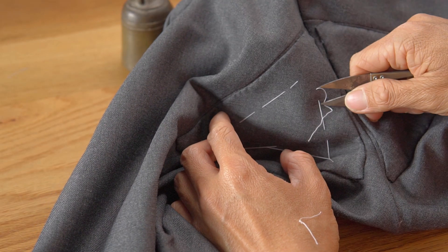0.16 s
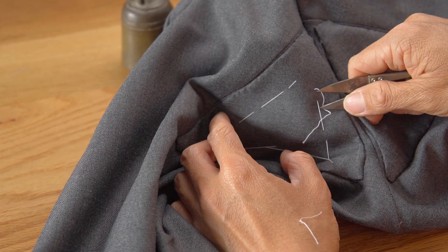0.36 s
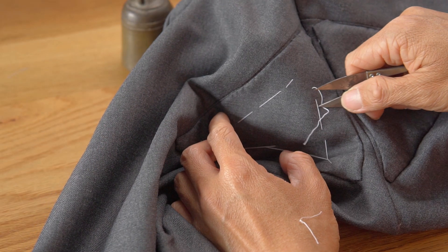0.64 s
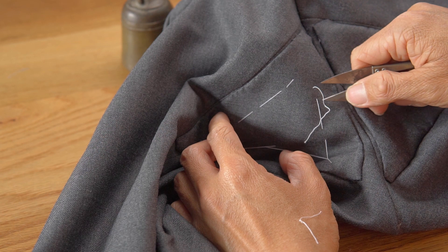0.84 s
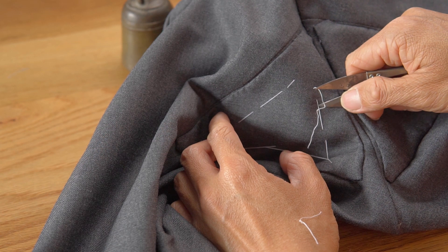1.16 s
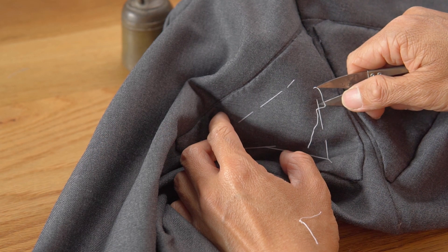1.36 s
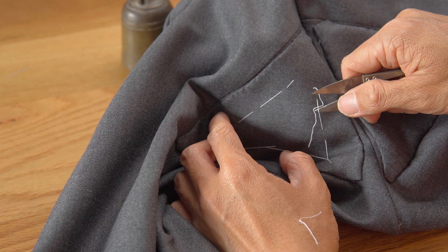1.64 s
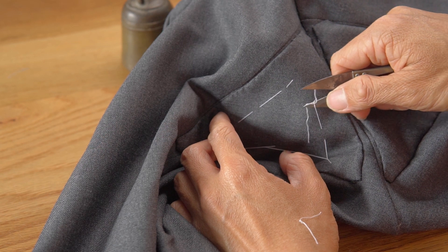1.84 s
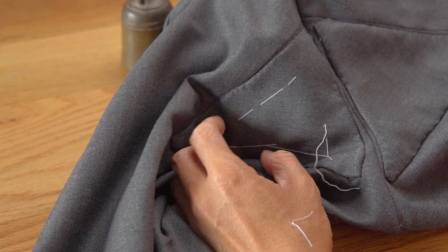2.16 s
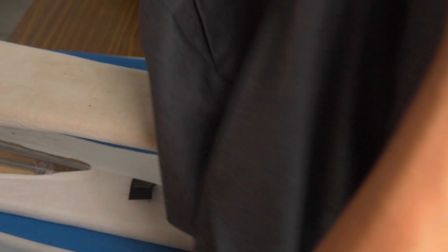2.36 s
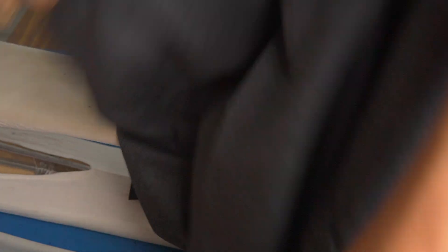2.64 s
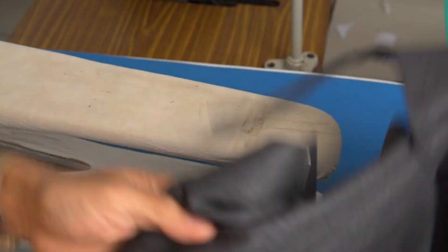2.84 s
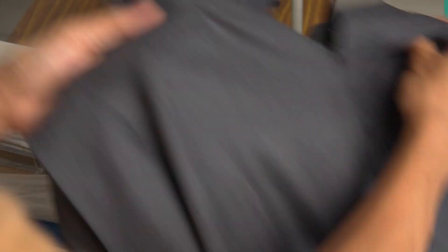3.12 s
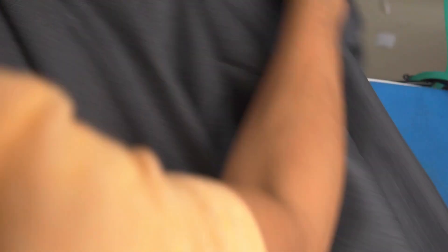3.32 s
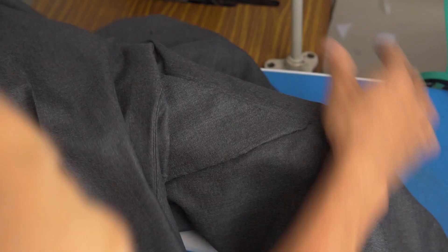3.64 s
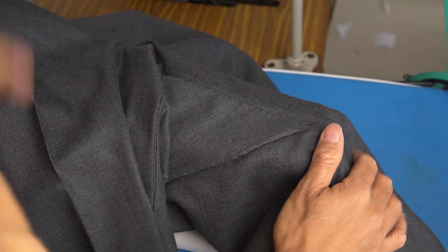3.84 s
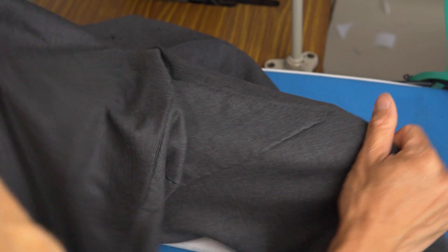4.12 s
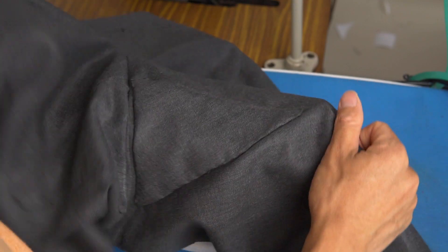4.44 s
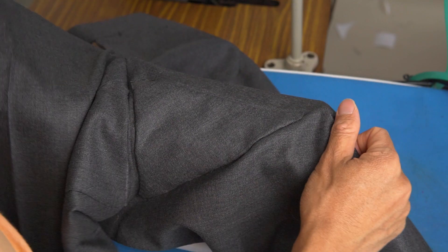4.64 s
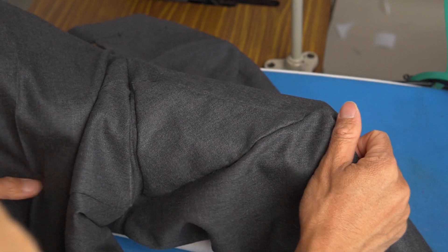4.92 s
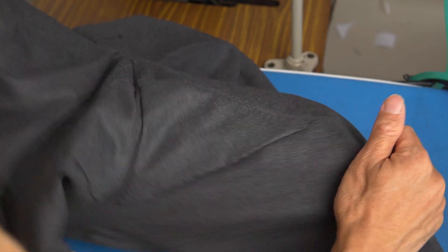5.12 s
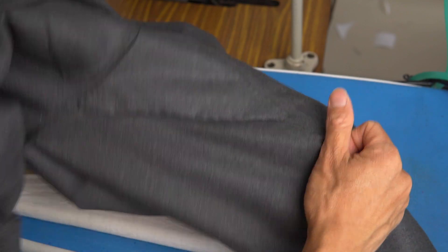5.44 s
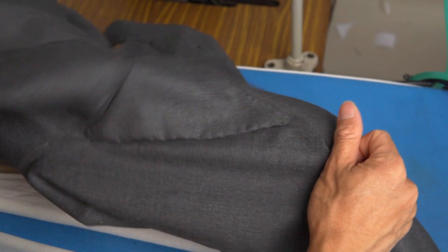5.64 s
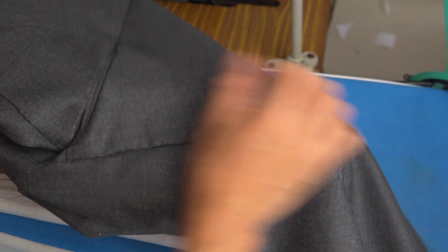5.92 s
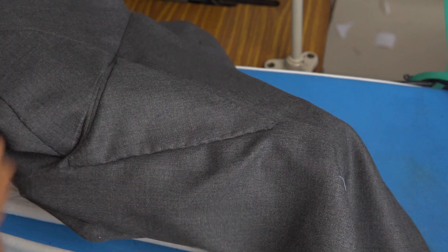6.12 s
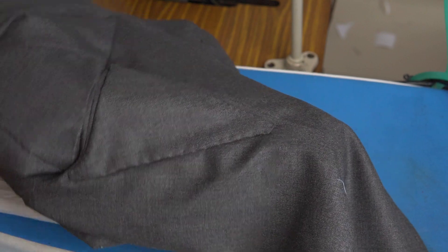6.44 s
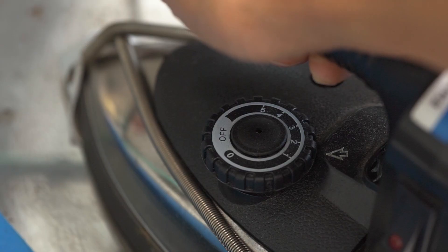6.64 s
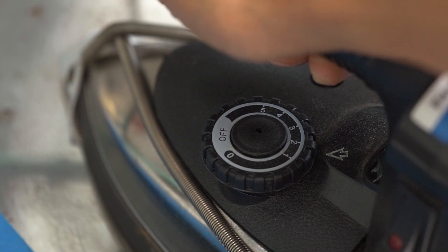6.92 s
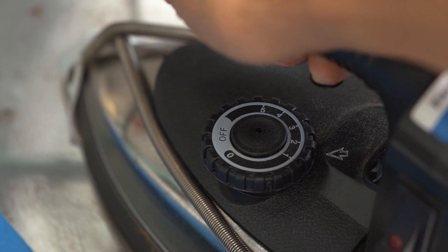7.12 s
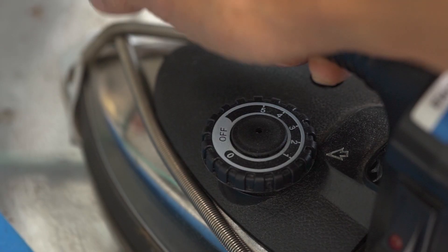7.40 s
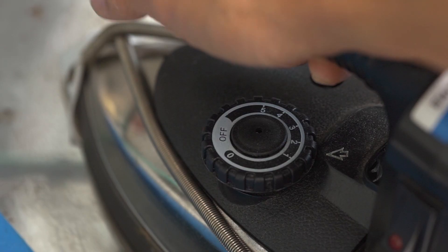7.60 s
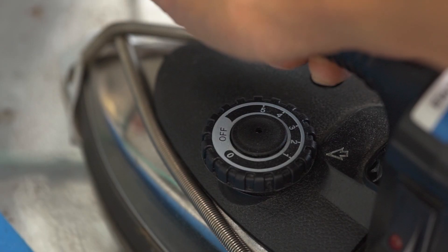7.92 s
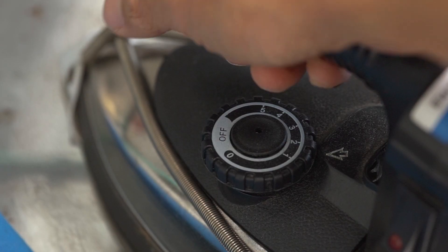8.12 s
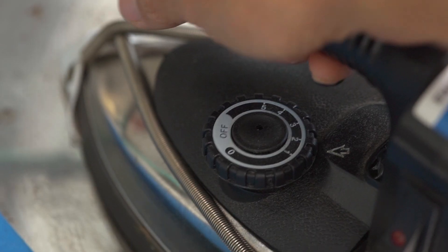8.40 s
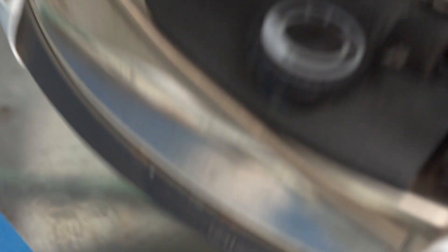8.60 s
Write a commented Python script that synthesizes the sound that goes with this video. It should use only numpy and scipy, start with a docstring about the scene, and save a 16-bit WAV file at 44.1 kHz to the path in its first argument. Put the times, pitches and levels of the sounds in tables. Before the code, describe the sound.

A small workshop heard close up, with ventilation rumble and a low rough machine drone throughout, slightly stronger near the end. From 0 to 1.7 s, tiny dry scissor ticks cluster around 0.2-0.35 and 1.35-1.6, with faint hand rubs on cloth. Near 1.9 a palm drags and ends in a dull pat. From 2.4 to 3.7 a heavy jacket is swung and spread: grainy rustle, low gusts, damped flaps, a strong snap at 2.96. Strokes and crisp snaps continue at 4.2-4.3 and 5.07, a tiny rising squeak at 5.33, flaps at 5.86 and 6.05; rustling stops at 6.55. A very loud, bright metallic valve clack cracks at 6.76, another at 7.06, with smaller rattles and low board thuds. Steam swells from 7.3, peaks near 7.6, then dulls and fades after 8.1. At 8.55 come a muffled knock and soft handle rub, then drone alone.

```python
"""A tailor's bench in a small workshop, close to one microphone: ventilation and a machine drone lie behind.
Short ticks of noise are scissors nipping threads; grainy noise is a hand on cloth, then a jacket being spread.
Damped tones with crisp noise are folds snapping and pats on the ironing board; the cloth squeaks once.
The steam iron's valve clacks on and off as a crack over many ringing modes, low tones thud on the board,
and swelling noise is its puff of steam. A short diffuse room echo follows the handwork and the valve."""
import sys
import numpy as np
from scipy import signal
from scipy.fft import rfft, irfft, next_fast_len
from scipy.io import wavfile
from scipy.ndimage import uniform_filter1d, map_coordinates

SR = 44100
rng = np.random.default_rng(int(sys.argv[2]) if len(sys.argv) > 2 else 0)


def wrap_up_sound(samples):
    """Save the sound to the file named by the first command line argument, as 16-bit audio."""
    columns = np.atleast_2d(samples).T
    # keep every value between -1 and 1, then stretch to whole-number steps
    tamed = np.clip(columns, -1, 1)
    steps = np.round(tamed * 32767).astype(np.int16)
    wavfile.write(sys.argv[1], SR, steps)


N = 386315
TIME = np.arange(N) / SR  # s

# All levels in the tables are relative within their source.
# ventilation rumble: f/Hz, level/dB per Hz
AIR_SPECTRUM = [(13, -32.5), (22, -1.5), (45, 0.5), (70, -7), (102, -5), (198, -11.5), (260, -9),
                (430, -15), (900, -19), (1320, -18), (1580, -27.5), (2300, -33), (5000, -44.5),
                (15500, -55)]
AIR_DB = -48.5
# resonances of the machine drone: f/Hz, width/Hz, level/dB
DRONE_MODES = [(99.5, 22.2, 1.5), (145.3, 22, 0), (195, 26, -2), (270.3, 26, -5), (391, 62, -13)]
DRONE_FIRST_DB, DRONE_SECOND_DB, DRONE_THIRD_DB = -52.5, -51.5, -48.5
DRONE_STEP, HANDLING_END = 2.0, 6.555  # s; the drone steps at both, and the rustling stops at the second
# decay of the workshop echo: f/Hz, t60/s
ROOM_DECAY = [(200, 0.58), (1500, 0.21), (4300, 0.46), (8000, 0.36), (11000, 0.29), (15000, 0.17)]

# swings of the jacket that push air at the microphone: t/s, level/dB
JACKET_SWINGS = [(2.72, -34), (3.27, -34), (3.57, -39.5), (3.85, -44.5), (4.2, -47), (6.08, -38)]
SWING_RISE_S, SWING_T60 = 0.069, 1.0  # s
# air pushed by a swing: f/Hz, level/dB per Hz
GUST_SPECTRUM = [(10, -11), (25, 3.5), (50, -14.5), (95, -14.5), (200, -26.5), (600, -79)]

# strokes of the hands over the cloth: middle t/s, length/s, rub level/dB, weight of the folds over the rub/dB
HAND_STROKES = [(0.062, 0.13, -63, -5), (0.36, 0.83, -71.5, -7), (1.55, 0.29, -69, -4),
                (1.84, 0.15, -64, -9), (2.17, 0.32, -64, -1), (2.44, 0.15, -58.0, 0),
                (2.728, 0.32, -50.5, 0), (2.769, 0.056, -44.5, 1), (2.939, 0.13, -52, 8),
                (3.154, 0.3, -51.0, 0), (3.3, 0.23, -51.0, 5), (3.535, 0.1, -54, 8),
                (3.59, 0.44, -56.0, -0.5), (3.959, 0.11, -50.5, -4), (4.063, 0.11, -49.5, -3),
                (4.243, 0.23, -49.0, 4.5), (4.55, 0.27, -55, 3), (4.924, 0.16, -52.5, 1),
                (5.093, 0.09, -49.0, 0.5), (5.262, 0.32, -52.5, 3), (5.51, 0.13, -56.5, 2),
                (5.7, 0.21, -51.0, 3.5), (5.925, 0.19, -57.5, 2), (6.094, 0.13, -55, 8),
                (6.385, 0.44, -51.5, 1)]
STROKE_STEEP = 3.55  # how abruptly a hand gathers speed and comes to rest
# hiss of the sliding weave: f/Hz, level/dB per Hz
WEAVE_SPECTRUM = [(710, -32), (1200, -4.5), (1520, -0.5), (1990, -3), (2320, -2.5), (2580, -2.5),
                  (3240, -4.5), (6250, -7.5), (6810, -10), (8830, -6), (10200, -15.5), (13600, -15),
                  (15800, -22)]
# lower rustle of the folds: f/Hz, level/dB per Hz
FOLDS_SPECTRUM = [(130, -18), (300, 1), (600, 2.5), (1100, -1), (1700, -8), (3000, -27), (6000, -47)]
# the weave hisses brighter the faster it slides and duller when bunched in folds
SHEEN_DB, SHEEN_AT_DB = 2.5, -54.5  # treble lift at this rub level, with no extra weight
SHEEN_PER_SPEED, SHEEN_PER_WEIGHT = 0.28, 0.64  # dB of treble per dB

# rub of the pressing palm: f/Hz, level/dB per Hz
PALM_SPECTRUM = [(170, -34), (330, 6), (700, -4.5), (1400, -1), (2300, -10), (4500, -15.5), (7000, -40)]
SWEEP_START, SWEEP_PRESS, SWEEP_END = 1.895, 1.957, 1.978  # s
SWEEP_RISE_S, SWEEP_PRESS_S, SWEEP_LIFT_S = 0.041, 0.0077, 0.0095
SWEEP_DB, PALM_LIGHT_DB, PALM_PRESSED_DB = -50, 4.5, 16.5  # palm levels are over the weave
SQUEAK_START, SQUEAK_S, SQUEAK_DB = 5.326, 0.046, -36.5
SQUEAK_HZ, SQUEAK_HZ_PER_S = 710, 9100

# scissor nips and ticks: t/s, level/dB, share of the low blade colour/dB
SCISSOR_NIPS = [(0.173, -40, -.3), (0.1885, -45, -1), (0.232, -39, -13), (0.311, -45.5, -1.5),
                (0.3507, -48, -3), (1.351, -42.5, -0.6), (1.4477, -47, -4), (1.504, -43, -4),
                (1.539, -47, -3), (1.611, -48, -5)]
# low blade colour: f/Hz, level/dB per Hz
BLADE_LOW_SPECTRUM = [(900, -12), (2000, 1), (4800, 2), (7000, -19)]
# high blade colour: f/Hz, level/dB per Hz
BLADE_HIGH_SPECTRUM = [(4000, -25), (7000, 4.5), (9000, -2), (14000, -4), (16000, 0)]
SNIP_T60 = 0.0097  # s

# folds snapping taut, hands patting the board, and one crisp burst at 2.4 s: t/s, level/dB, pitch f/Hz,
# relative life/s, crispness/dB
CLOTH_FLAPS = [(1.975, -33, 380, .015, -20), (2.398, -47, 1800, .04, 19), (2.689, -33, 576, .03, -20),
               (2.768, -39, 900, 0.016, -7), (2.820, -30, 580, 0.0085, -20),
               (2.9644, -20, 730, 0.0075, -18), (3.227, -30, 550, 0.026, -13),
               (3.331, -31.5, 494, 0.032, -20), (3.510, -27.5, 374, 0.082, -1.5),
               (3.556, -31.5, 282, 0.14, -25), (4.2221, -25.5, 900, 0.0088, -17),
               (4.256, -31.5, 450, .015, -20), (4.3256, -21, 1050, 0.0091, 1.5),
               (5.074, -31, 1080, 0.017, -1), (5.859, -33, 1400, 0.0073, -2),
               (6.0427, -27, 425, 0.036, -2.5), (6.0486, -26.5, 400, 0.03, -8),
               (6.059, -41, 1060, 0.22, -14)]
# snap of a crease: f/Hz, level/dB per Hz
CREASE_SPECTRUM = [(600, -24), (1500, 8), (3500, -3), (6000, -8), (9000, -3.5), (15000, -31)]

# palm on the iron's handle: f/Hz, level/dB per Hz
GRIP_SPECTRUM = [(300, 3), (1500, 0.5), (5000, -15), (9000, -22), (15000, -32.5)]
GRIP_AT, GRIP_S, GRIP_DB = 8.56, 0.18, -58.5  # middle and length in s

# steam jet: f/Hz, level/dB per Hz
STEAM_SPECTRUM = [(300, -3.5), (900, 0.5), (2500, 2), (3200, -1.5), (4200, 3), (5100, 1.5), (6000, -1.5),
                  (7100, -2.5), (7700, 2.5), (9150, 2.5), (9500, -9.5), (12500, -8), (13900, -4.5),
                  (15000, -12)]
# cavities that colour the jet: f/Hz, width/Hz, level/dB
STEAM_CAVITIES = [(920, 90, -6), (1780, 110, -9), (5000, 248, -6), (6560, 170, -9)]
STEAM_OPEN, STEAM_SAG, STEAM_SHUT = 7.295, 7.67, 8.11  # s
STEAM_DB, STEAM_RISE_S, SAG_DB_PER_S, SHUT_T60 = -38, 0.28, 30.5, 0.65
JET_BRIGHT_DB, JET_BRIGHT_PER_FLOW = 2, 0.57  # treble at full flow; dB of treble per dB of flow

# thuds of the iron's body on the board: t/s, level/dB
IRON_THUDS = [(6.761, -39.5), (6.911, -34.5), (7.06, -38), (7.318, -33.5), (8.559, -34.5)]
# ringing modes of the valve and switch: f/Hz, level pulling in/dB, level dropping out/dB, t60/s
VALVE_MODES = [(520, -37.5, -37.5, 0.087), (1080, -38.5, -36, 0.18), (1210, -31, -33, 0.088),
               (1394, -23.5, -27, 0.028), (1755, -23, -20, 0.032), (2193, -24.5, -25, 0.035),
               (3646, -19, -15.5, 0.028), (4020, -16.5, -20, .022), (4326, -12, -12.5, 0.025),
               (4474, -17.5, -12.5, 0.0073), (6070, -19, -33, 0.019), (6940, -11, -14.5, 0.018),
               (7400, -16, -9.5, 0.032), (8410, -21.5, -12, .022), (9470, -10.5, -16.5, 0.027),
               (10200, -17.5, -12.5, 0.022), (10400, -10, -7.5, 0.02), (11270, -3, -8, 0.012),
               (10880, -15.5, -9.5, 0.0054), (12300, -21.5, -19.5, 0.014), (13270, -2.5, -15, 0.014),
               (14500, -8.5, -12.5, 0.017), (14800, -20, -14, .012), (14900, -23, -18, .016)]
# valve strokes and handle rattles: t/s, level/dB, drop-out share 0-1, treble cut-off f/Hz
VALVE_CLACKS = [(6.698, -36, 0.2, 8950), (6.708, -35, 0.2, 9000), (6.7275, -44, 0, 14100),
                (6.758, -0.5, 0, 30800), (6.9012, -21.5, 0.9, 10900), (6.913, -34, 0.8, 14000),
                (6.9672, -31, 0.9, 5000), (6.985, -32, 0.9, 5000), (7.057, 0, 0.86, 30200),
                (7.309, -18, 0.8, 1750), (7.4855, -14, 1, 5200), (8.516, -40, 0.76, 5010),
                (8.554, -29, 0.84, 2000)]
# crack of the plunger: f/Hz, level/dB per Hz
CRACK_SPECTRUM = [(100, -4.5), (400, -5.5), (800, -18.5), (1600, 0), (2900, -9.5), (4400, 8.5), (5600, -9),
                  (8000, 0.5), (11000, 4), (16000, -3)]
TOP_HZ = 15750  # band limit at the microphone


def amp(db):
    """Amplitude of a level in dB."""
    return 10 ** (np.asarray(db) / 20)


def unit(x):
    """x at rms 1."""
    return x / np.sqrt(np.mean(x ** 2) + 1e-20)


def along(points, hz):
    """Second column of (f/Hz, value) points, read on a log frequency axis."""
    f, v = np.transpose(points)
    return np.interp(np.log(hz + 1), np.log(f + 1), v)


def during(start, end):
    """A gate with 3 ms soft edges."""
    is_open = (TIME >= start) & (TIME < end)
    return uniform_filter1d(is_open * 1., size=128)


def ramp(start, length):
    """A smooth rise from 0 to 1."""
    return np.sin(np.pi / 2 * np.clip((TIME - start) / length, 0, 1)) ** 2


def arch(middle, length):
    """Speed of one movement of the hand: it gathers, holds and comes to rest."""
    return 1 / (1 + np.abs(2 * (TIME - middle) / length) ** STROKE_STEEP)


def fade(t, t60):
    """Decay by 60 dB in t60."""
    return np.exp(-np.log(1000) * t / t60)


def wobble(rate):
    """A smooth random curve, rate knots a second, repeating after 4096 knots."""
    return map_coordinates(rng.standard_normal(4096), [TIME * rate], mode="wrap")


def filtered(x, response):
    """x times a response of frequency."""
    m = next_fast_len(len(x) + SR // 4)
    hz = np.fft.rfftfreq(m, 1 / SR)
    return irfft(rfft(x, m) * response(hz), m)[:len(x)]


def resonance(hz, centre, width):
    """Response of one damped resonance."""
    return 1j * hz * width / (centre ** 2 - hz ** 2 + 1j * hz * width)


def coloured(x, spectrum):
    """x given a spectrum, at rms 1."""
    return unit(filtered(x, lambda hz: amp(along(spectrum, hz))))


def noise(spectrum, size=N):
    """Smooth noise with a spectrum."""
    return coloured(rng.standard_normal(size), spectrum)


def friction(spectrum, grain_db, rate):
    """Fibres catch and slip in clumps of uneven size: noise of random level, then coloured."""
    grains = rng.standard_normal(N) * amp(grain_db * wobble(rate))
    return coloured(grains, spectrum)


def add(track, s, sound):
    """Mix a sound into the track at time s."""
    part = track[round(s * SR):][:len(sound)]
    part += sound[:len(part)]


def room(x):
    """The workshop's diffuse echo: a noise tail whose decay depends on frequency."""
    hz, t, z = signal.stft(rng.standard_normal(SR), SR, nperseg=256)
    decay = fade(t, along(ROOM_DECAY, hz)[:, None])
    tail = signal.istft(z * decay, SR, nperseg=256)[1]
    tail = tail * (1 - fade(np.arange(len(tail)) / SR, 0.022))  # soft build-up
    return signal.fftconvolve(x, tail / np.linalg.norm(tail))[:N]


def workshop():
    """Ventilation rumble and a low, rough machine drone whose level steps up twice."""
    drone = filtered(
        rng.standard_normal(N),
        lambda hz: sum(amp(db) * resonance(hz, c, w) ** 2 for c, w, db in DRONE_MODES))
    drone_db = np.select([TIME < DRONE_STEP, TIME < HANDLING_END],
                         [DRONE_FIRST_DB, DRONE_SECOND_DB], DRONE_THIRD_DB)
    return amp(AIR_DB) * noise(AIR_SPECTRUM) + amp(drone_db) * unit(drone)


def draught():
    """Each swing of the jacket sends a soft low gust that dies away."""
    power = 0
    for s, db in JACKET_SWINGS:
        gust = ramp(s - SWING_RISE_S, SWING_RISE_S) * fade(np.maximum(TIME - s, 0), SWING_T60)
        power = power + (amp(db) * gust) ** 2
    return np.sqrt(power) * noise(GUST_SPECTRUM)


def cloth():
    """With each stroke the weave hisses as it slides and the folds rustle lower down."""
    rub_power = folds_power = 1e-12
    for middle, length, db, weight_db in HAND_STROKES:
        power = (amp(db) * arch(middle, length)) ** 2
        rub_power = rub_power + power
        folds_power = folds_power + power * amp(weight_db) ** 2
    rub_db, folds_db = 10 * np.log10(rub_power), 10 * np.log10(folds_power)
    grip = wobble(35)
    weave = friction(WEAVE_SPECTRUM, grain_db=1.0, rate=900)
    treble = filtered(weave, lambda hz: 1 - 1 / (1 + (hz / 5000) ** 4))
    speed_db = SHEEN_PER_SPEED * (rub_db - SHEEN_AT_DB)
    bunching_db = SHEEN_PER_WEIGHT * (folds_db - rub_db)
    sheen = amp(SHEEN_DB + speed_db - bunching_db)
    # the colour shifts while the power is held roughly even
    weave = (weave + (sheen - 1) * treble) / np.sqrt((1 + sheen ** 2) / 2)
    rub = amp(rub_db + 2.0 + 0.92 * grip) * weave
    folds = amp(folds_db - 1.5 + 0.47 * grip) * friction(FOLDS_SPECTRUM, grain_db=3.0, rate=350)
    return (rub + folds) * during(0, HANDLING_END)


def sweep():
    """The hand drags over the cloth, presses harder so the palm's low rub grows, and lifts off."""
    contact = ramp(SWEEP_START, SWEEP_RISE_S) * (1 - ramp(SWEEP_END, SWEEP_LIFT_S))
    pressed = ramp(SWEEP_PRESS, SWEEP_PRESS_S)
    palm_db = PALM_LIGHT_DB + (PALM_PRESSED_DB - PALM_LIGHT_DB) * pressed
    weave = friction(WEAVE_SPECTRUM, grain_db=2.5, rate=400)
    palm = amp(palm_db) * friction(PALM_SPECTRUM, grain_db=1.0, rate=660)
    return amp(SWEEP_DB) * contact * (weave + palm)


def squeak():
    """Stick-slip speeds up as the cloth is pulled tight: a brief, rough rising chirp."""
    age = np.clip(TIME - SQUEAK_START, 0, SQUEAK_S)
    pitch = SQUEAK_HZ + SQUEAK_HZ_PER_S * age
    phase = 2 * np.pi * np.cumsum(pitch * (1 + .08 * wobble(500))) / SR
    slips = unit(amp(4 * wobble(450)))
    swell = np.sin(np.pi * age / SQUEAK_S) ** 2
    tone = np.sin(phase) + amp(-10) * np.sin(2 * phase)
    return amp(SQUEAK_DB) * swell * slips * tone


def scissors():
    """The blades part a thread with a tiny dry tick, a blend of two noise colours."""
    out, t = np.zeros(N), np.arange(SR // 12) / SR
    for s, db, low_db in SCISSOR_NIPS:
        low = amp(low_db)
        high = np.sqrt(1 - low ** 2)  # the two shares keep the power even
        tick = low * noise(BLADE_LOW_SPECTRUM, size=len(t)) + high * noise(BLADE_HIGH_SPECTRUM, size=len(t))
        add(out, s, amp(db) * tick * fade(t, SNIP_T60) * (1 - fade(t, 0.0037)))
    return out


def flaps():
    """Each flap is a damped push of air with the crisp snap of a crease, then a short flutter of the fold."""
    out, t = np.zeros(N), np.arange(SR // 8) / SR
    for s, db, pitch, life, crisp_db in CLOTH_FLAPS:
        push = np.sin(2 * np.pi * pitch * t) * fade(t * pitch, 3.1)  # 60 dB down in 3.1 cycles
        snap = amp(crisp_db - 12) * noise(CREASE_SPECTRUM, size=len(t)) * fade(t, 0.019)
        flutter = unit(filtered(rng.standard_normal(len(t)),
                                lambda hz: resonance(hz, pitch, 1.4 * pitch) ** 2))
        flutter = flutter * fade(t, 1.82 * life) * (1 - fade(t, 0.0076))
        add(out, s, amp(db) * (1.65 * push + snap + 0.51 * flutter))
    return out


def regrip():
    """The hand shifts its grip: the palm slides softly on the iron's handle."""
    return amp(GRIP_DB) * arch(GRIP_AT, GRIP_S) * friction(GRIP_SPECTRUM, grain_db=3.5, rate=580)


def steam():
    """Steam swells through the soleplate holes, turns duller as the pressure sags, and is shut off."""
    pressure = amp(-SAG_DB_PER_S * np.maximum(TIME - STEAM_SAG, 0))
    closing = fade(np.maximum(TIME - STEAM_SHUT, 0), SHUT_T60)
    flow = ramp(STEAM_OPEN, STEAM_RISE_S) * pressure * closing
    bright = amp(JET_BRIGHT_DB) * flow ** JET_BRIGHT_PER_FLOW
    jet = unit(filtered(
        noise(STEAM_SPECTRUM),
        lambda hz: 1 + sum(amp(db) * resonance(hz, c, w) for c, w, db in STEAM_CAVITIES)))
    body = filtered(jet, lambda hz: 1 / (1 + (hz / 6500) ** 2))
    treble = jet - body
    return amp(STEAM_DB + 0.2 * wobble(14)) * flow * (body + bright * treble)


def thuds():
    """Each jolt rocks the heavy iron on the padded board: a damped low tone."""
    out, t = np.zeros(N), np.arange(SR // 5) / SR
    body = np.sin(2 * np.pi * 218 * t) * fade(t, 0.092) * (1 - fade(t, 0.037))
    for s, db in IRON_THUDS:
        add(out, s, amp(db + 4.0) * body)
    return out


def valve():
    """The plunger slams home with a crack and rings its housing; loose parts chatter and smear the modes."""
    out, t = np.zeros(N), np.arange(SR // 10) / SR
    free = np.maximum(t - .0018, 0)  # the ring only starts to die once the plunger has seated
    for s, db, drop, cutoff in VALVE_CLACKS:
        clack = amp(-6.5) * noise(CRACK_SPECTRUM, size=len(t)) * fade(free, 0.023)
        for hz, pull_db, drop_db, t60 in VALVE_MODES:
            # random pitch deviation, 2.3 % rms
            chatter = .023 * unit(uniform_filter1d(rng.standard_normal(len(t)), size=44))
            phase = 2 * np.pi * (hz * np.cumsum(1 + chatter) / SR + rng.random())
            mode_db = pull_db + drop * (drop_db - pull_db)
            clack = clack + amp(mode_db) * fade(free, t60) * np.sin(phase)
        clack = clack * (1 - fade(t, 0.0069))  # soft onset
        clack = filtered(clack, lambda hz: 1 / (1 + 1j * hz / cutoff) ** 2)
        add(out, s, amp(db - 3.5) * clack)
    return out


def scene():
    """Workshop air, handwork and iron at one microphone, the same in both channels."""
    background = workshop() + draught()
    handwork = scissors() + flaps() + sweep() + squeak() + thuds() + regrip()
    handwork_echo = amp(-18) * room(handwork)
    # the iron radiates a different clack in each direction, and the room blends them
    clack_echo = amp(-14.5) * sum(room(valve()) for _ in range(3))
    mono = background + cloth() + handwork + handwork_echo + steam() + valve() + clack_echo
    return np.array([mono, mono])


def record(dry):
    """Peaks beyond full scale clip; a steep low-pass then holds the band above the limit 70 dB down."""
    lowpass = signal.ellip(12, .1, 70, TOP_HZ, fs=SR, output="sos")
    return signal.sosfilt(lowpass, np.clip(dry, -1, 1))


dry = scene()
out = record(dry)
wrap_up_sound(out)
```